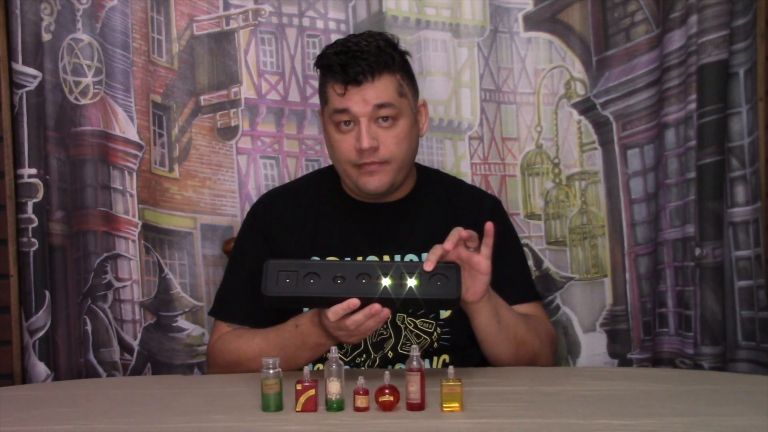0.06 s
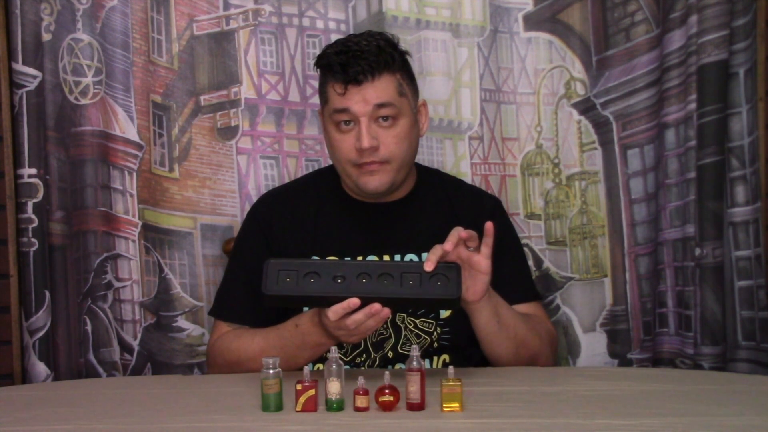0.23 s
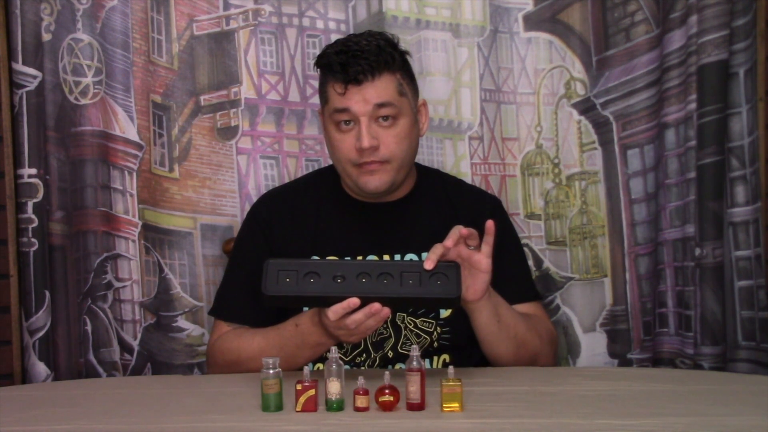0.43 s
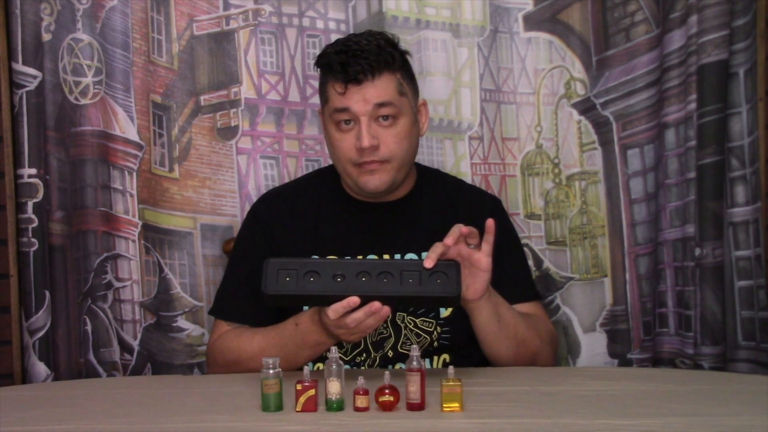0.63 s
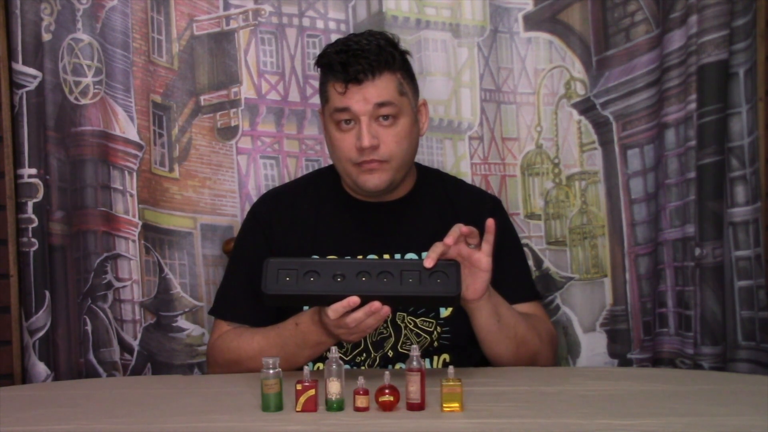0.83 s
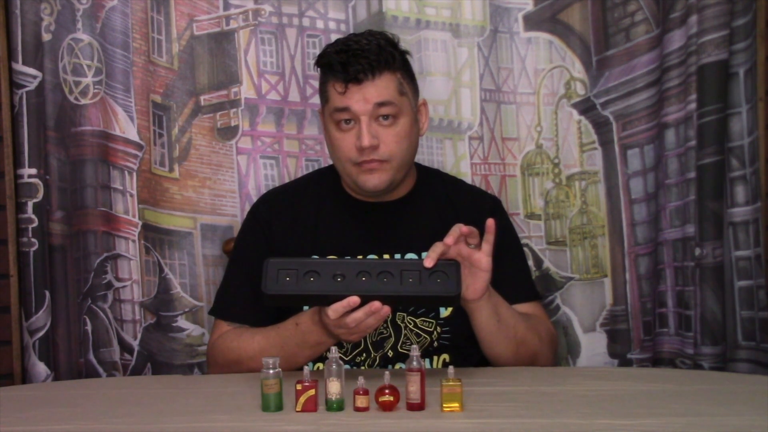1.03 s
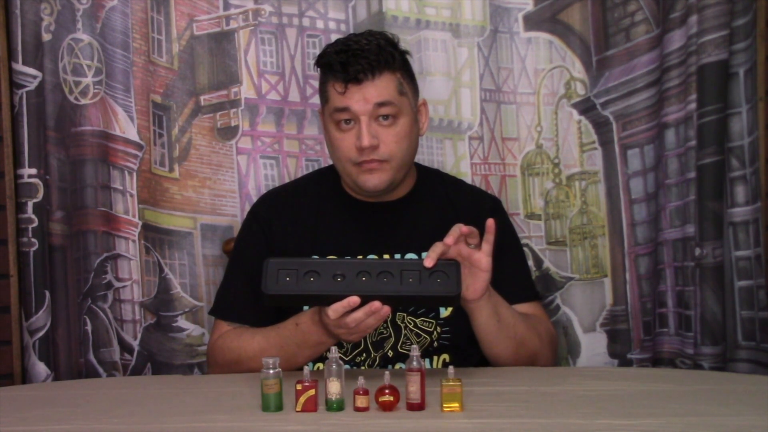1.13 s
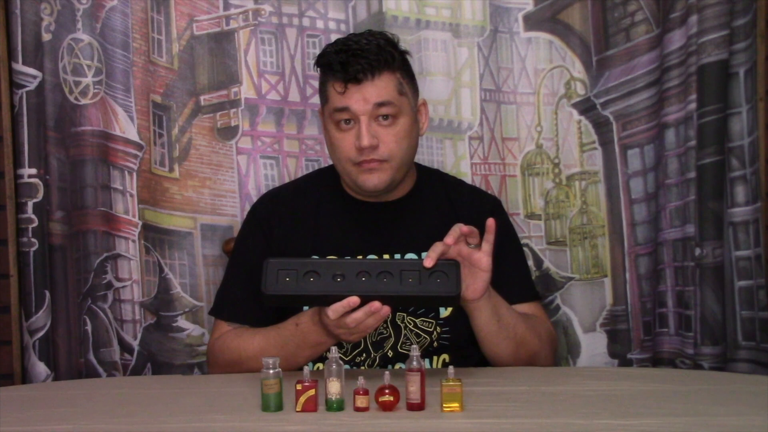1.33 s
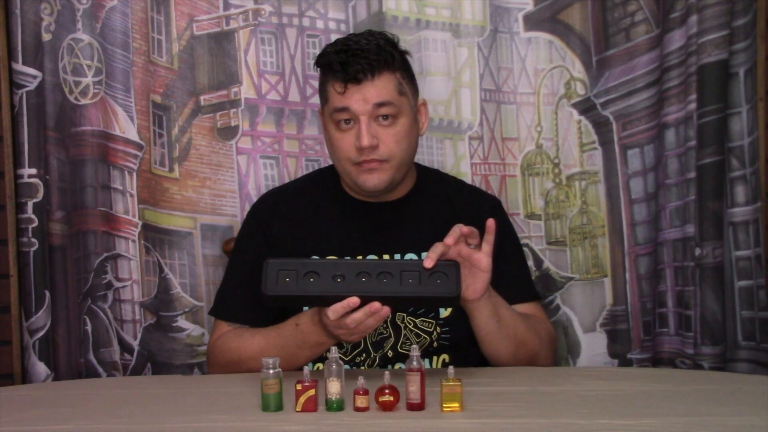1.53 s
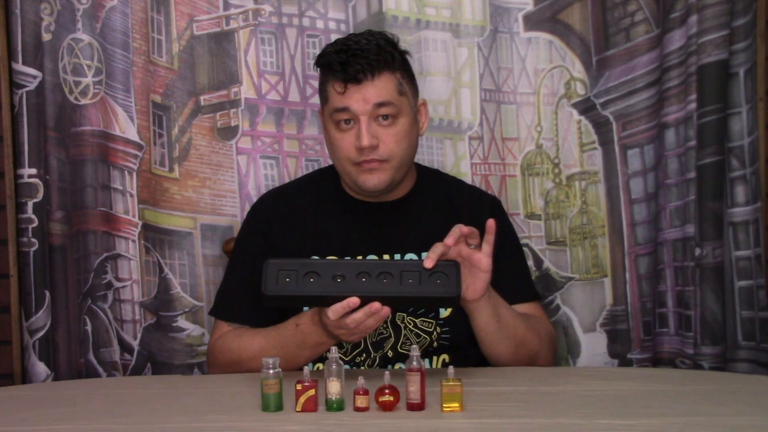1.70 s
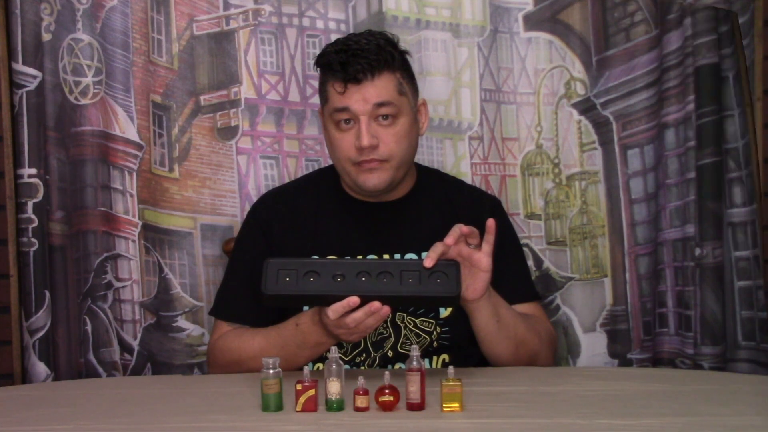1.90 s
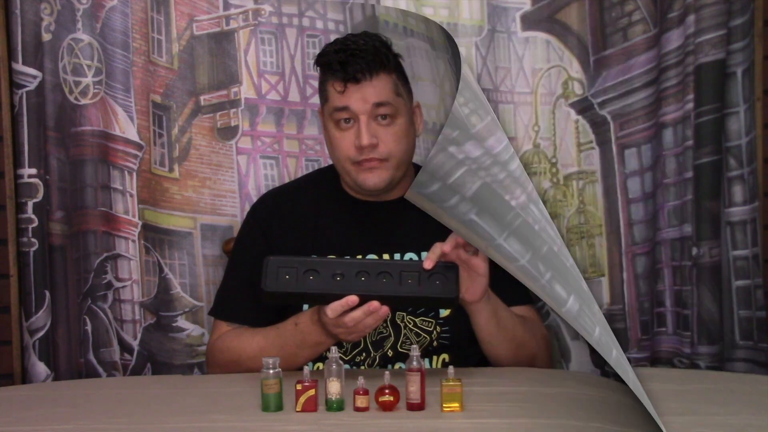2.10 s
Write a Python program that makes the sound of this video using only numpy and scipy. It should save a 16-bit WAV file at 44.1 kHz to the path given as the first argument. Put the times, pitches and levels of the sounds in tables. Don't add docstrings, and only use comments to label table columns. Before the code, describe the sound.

A push switch in a hollow plastic lamp base snaps down sharply, then springs back more softly and brightly, at arm's length from the microphone in a small padded room, with faint hiss and low rumble.

```python
import sys
import numpy as np
from scipy import signal
from scipy.fft import rfft, irfft, next_fast_len
from scipy.io import wavfile
from scipy.ndimage import map_coordinates

SR = 44100
rng = np.random.default_rng(int(sys.argv[2]) if len(sys.argv) > 2 else 0)


def invert_db(level):
    return 10 ** (np.asarray(level, dtype=float) / 20)


def wav_out(sig):
    wavfile.write(sys.argv[1], SR, np.round(np.clip(np.atleast_2d(sig).T, -1, 1) * 32767).astype(np.int16))


N = 94815

# frequency in Hz, density in dB per Hz.
RUMBLE_SPECTRUM = [(12, -67), (20, 1.5), (107, -4), (147, -5), (195, -6.5), (380, -13), (700, -17.5),
                   (910, -49), (1540, -120)]
HISS_SPECTRUM = [(410, -32), (750, -1.5), (1670, -6), (3000, -9), (7440, -10), (10400, -13.5), (13500, -14),
                 (16000, -15.5)]
# frequency in Hz, density in dB per Hz.
SIDE_SPECTRUM = [(20, -6), (300, -1), (900, -7), (3000, -12), (6000, -20), (16000, -27)]
# frequency in Hz, level in dB rms.
WHINES = [
    (59.2, -55.5),
    (120, -60.5),
    (360.7, -65.5),
    (12252, -69),
]
# frequency in Hz, T60 in seconds.
ROOM_T60 = [(400, 0.14), (1000, 0.27), (2800, 0.24), (7300, 0.19), (12000, 0.16), (16000, 0.14)]
# delay in seconds, level in dB.
EARLY_ECHOES = [(.0032, -11), (.0044, -9), (.0059, -12), (.0085, -9), (.0105, -11), (.0203, -17)]
# frequency in Hz, level in dB.
DOWN_SPREAD = [(700, -15), (1500, -4.5), (4500, -1), (5700, -2), (6400, -13), (7200, -1.5), (10600, -4),
               (13000, -23)]
UP_SPREAD = [(500, -18), (1100, -3), (3400, -10.5), (4300, -4.5), (6200, -7), (8000, -2.5), (11300, -6.5),
             (11900, -15)]
# frequency in Hz, down-stroke level in dB, return level in dB, T60 in seconds.
HOUSING_MODES = [(299, -35.5, -27, 0.13), (591, -26, -24, .07), (667, -24.5, -20.5, .12),
                 (719, -29.5, -21, .18), (997, -35, -28, .08), (1323, -25, -28, .16),
                 (1560, -26, -25.5, .14), (1872, -29, -34, 0.21), (2350, -29, -31, 0.043),
                 (2735, -28.5, -22, 0.14), (4074, -22.5, -26, 0.11), (4780, -23, -33, 0.1),
                 (7340, -20, -21, .07)]
# frequency in Hz, bandwidth in Hz, level in dB.
DOWN_PEAKS = [(650, 260, -20), (1500, 600, -15), (2740, 400, -6), (4050, 500, 1), (5300, 600, -10),
              (7250, 450, 5), (8800, 800, -10), (10100, 750, -3), (12800, 1500, -13)]
UP_PEAKS = [(800, 600, -4), (1500, 700, -12), (2750, 500, -11), (4110, 520, 0), (5430, 500, -9),
            (6900, 700, -6), (8900, 600, 3), (10600, 900, -7), (14000, 3000, -6)]
# delay in seconds, level in dB.
DOWN_CONTACTS = [
    (0, -18),
    (.0001, 0),
]
UP_CONTACTS = [
    (0, -4),
    (.0004, -2),
]
# treble corner in Hz, down stroke then return.
CONTACT_HZ = [8900, 14000]
# start in seconds, peak level in dB.
STROKES = [
    (.2045, -2),
    (.3631, -14),
]

RUMBLE_DB, HISS_DB, WHINE_SWAY_DB = -47, -52, 1.5
ROOM_DB = (5.5, 6.5)
ROOM_BUILD_S, NEAR_DB, NEAR_T60_SHARE = 0.00058, 3, 0.48
HOUSING_BUILD_S = 0.00074
SIDE_DB, SNAP_SIDE_DB = -32, -59
FADE_FROM_S, FADE_LENGTH_S = 1.79, 1.3
TOP_HZ, ABOVE_TOP_DB = 15750, -50


def unit(x):
    return x / np.sqrt(np.mean(x ** 2) + 1e-20)


def along(points, hz):
    point_hz, value = np.transpose(points)
    return np.interp(np.log(hz + 1), np.log(point_hz + 1), value)


def filtered(x, response):
    size = next_fast_len(len(x) + 8192)
    spectrum = rfft(x, size) * response(np.fft.rfftfreq(size, 1 / SR))
    return irfft(spectrum, size)[:len(x)]


def wobble(rate_hz):
    knots = rng.standard_normal(int(N * rate_hz / SR) + 4)
    return map_coordinates(knots, [np.arange(N) * rate_hz / SR])


def noise(spectrum):
    return unit(filtered(rng.standard_normal(N), lambda hz: invert_db(along(spectrum, hz))))


def whine(hz, db):
    t = np.arange(N) / SR
    level = np.sqrt(2) * invert_db(db + WHINE_SWAY_DB * wobble(8.63))
    return level * np.sin(2 * np.pi * hz * t + 1.7 * wobble(6.96))


def background():
    rumble = invert_db(RUMBLE_DB + 0.58 * wobble(2.75)) * noise(RUMBLE_SPECTRUM)
    whines = sum(whine(hz, db) for hz, db in WHINES)
    hiss = invert_db(HISS_DB + 0.37 * wobble(8.5)) * noise(HISS_SPECTRUM)
    return rumble + hiss + whines


def echoes(rows):
    return lambda hz: sum(invert_db(db) * np.exp(-2j * np.pi * hz * s) for s, db in rows)


def room_tail(spread):
    hz, t, z = signal.stft(rng.standard_normal(SR // 2), SR, nperseg=128)
    wash_db = -60 * t / along(ROOM_T60, hz)[:, None]
    near_db = NEAR_DB + wash_db / NEAR_T60_SHARE
    decay = np.hypot(invert_db(wash_db), invert_db(near_db))
    colour = invert_db(along(spread, hz)[:, None])
    tail = signal.istft(z * colour * decay, SR, nperseg=128)[1][:SR // 2]
    tail = tail * (1 - np.exp(-(np.arange(len(tail)) / SR / ROOM_BUILD_S) ** 2))
    return tail / np.linalg.norm(tail)


def housing_ring(t, modes_db):
    ring = np.zeros(len(t))
    for (hz, _, _, t60_s), db in zip(HOUSING_MODES, modes_db):
        ring += invert_db(db - 60 * t / t60_s) * np.sin(2 * np.pi * (hz * t + rng.random()))
    return ring * (1 - np.exp(-t / HOUSING_BUILD_S))


def switch_body(peaks):
    def response(f):
        total = 0
        for k, (hz, width_hz, db) in enumerate(peaks):
            damping = 1j * f * width_hz
            total = total + (-1) ** k * invert_db(db) * damping / (hz * hz - f * f + damping)
        return total
    return response


def crack(t, peaks, contacts, contact_hz):
    impulse = 1. * (t == 0)
    blows = filtered(impulse, lambda f: echoes(contacts)(f) / (1 + 1j * f / contact_hz) ** 2)
    direct = -filtered(blows, switch_body(peaks))
    return direct / np.abs(direct).max()


def snap(peaks, contacts, modes_db, spread, room_db, contact_hz):
    t = np.arange(SR // 2) / SR
    direct = crack(t, peaks, contacts, contact_hz)
    ring = housing_ring(t, modes_db)
    walls = filtered(direct, echoes([(s + rng.normal(0, .0001), db) for s, db in EARLY_ECHOES]))
    room = invert_db(room_db) * np.linalg.norm(direct) * room_tail(spread)
    return direct + walls + room + ring


def switch():
    out = np.zeros(N + SR)
    _, down_db, up_db, _ = np.transpose(HOUSING_MODES)
    down = snap(DOWN_PEAKS, DOWN_CONTACTS, down_db, DOWN_SPREAD, ROOM_DB[0], CONTACT_HZ[0])
    up = snap(UP_PEAKS, UP_CONTACTS, up_db, UP_SPREAD, ROOM_DB[1], CONTACT_HZ[1])
    for (start_s, db), stroke in zip(STROKES, (down, up)):
        out[round(start_s * SR):][:SR // 2] += invert_db(db) * stroke
    return out[:N]


def scene():
    clicks = switch()
    mid = clicks + background()
    side = invert_db(RUMBLE_DB + SIDE_DB) * noise(SIDE_SPECTRUM)
    side = side + invert_db(SNAP_SIDE_DB) * clicks * rng.standard_normal(N)
    return np.array([mid + side, mid - side])


def top_cut(x):
    return signal.sosfilt(signal.butter(12, 16640, fs=SR, output="sos"), x)


def record(dry):
    fade = np.clip(1 - (np.arange(N) / SR - FADE_FROM_S) / FADE_LENGTH_S, 0, 1)
    limited = np.array([filtered(x, lambda hz: np.where(hz < TOP_HZ, 1, invert_db(ABOVE_TOP_DB))) for x in dry])
    return top_cut(limited * fade)


dry = scene()
out = record(dry)
wav_out(out)
```